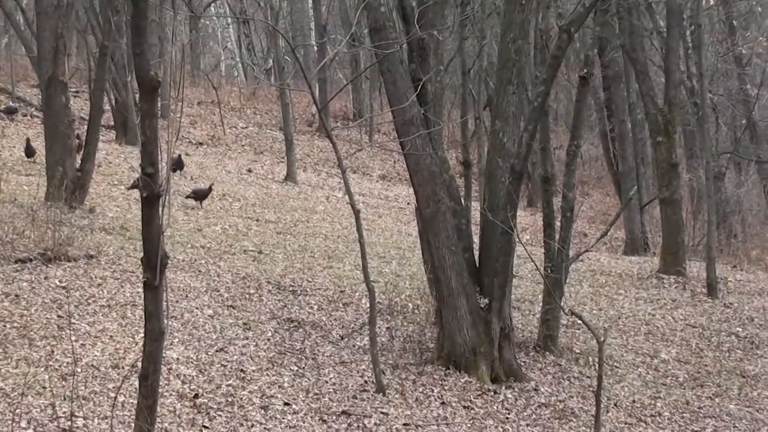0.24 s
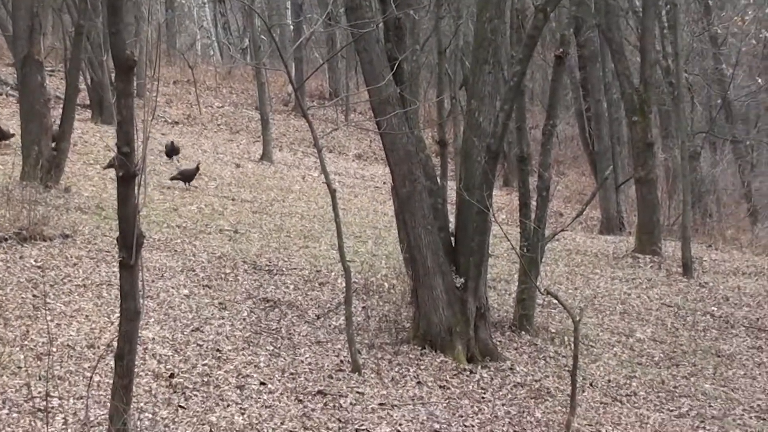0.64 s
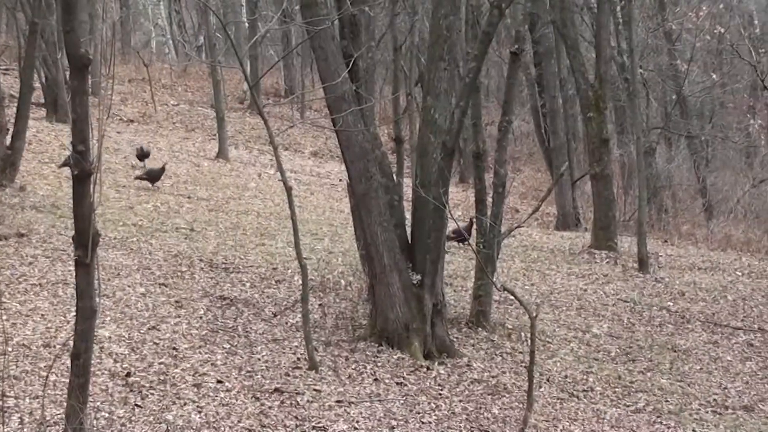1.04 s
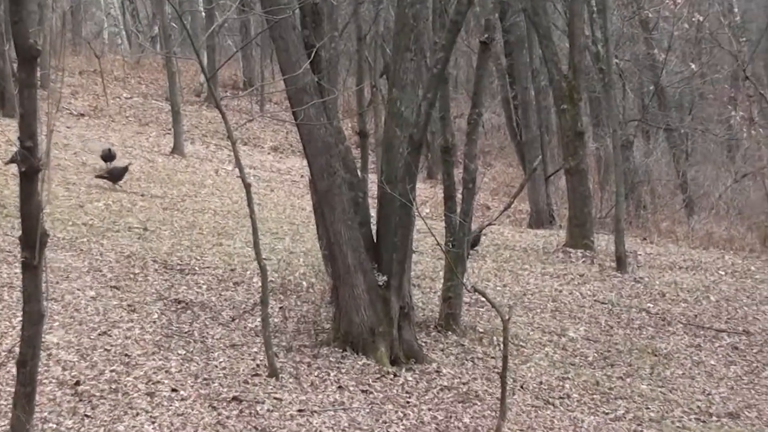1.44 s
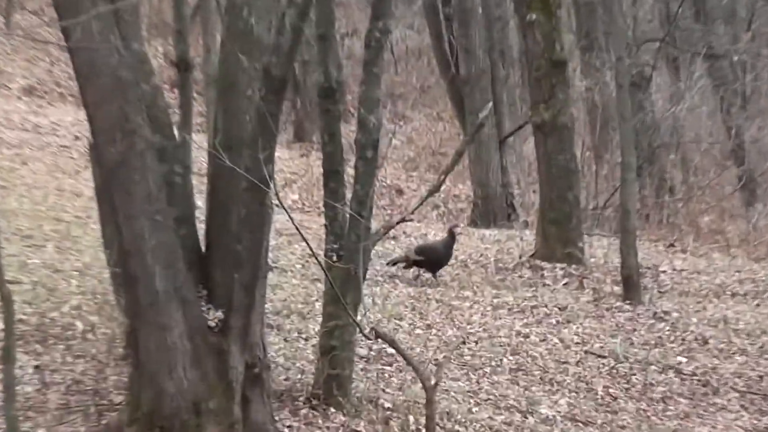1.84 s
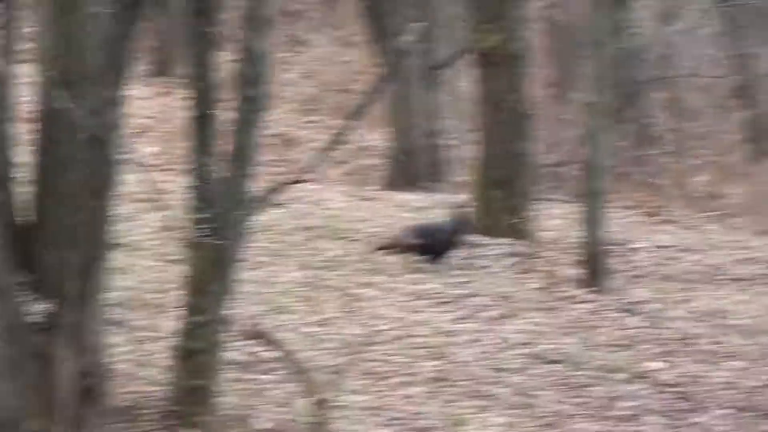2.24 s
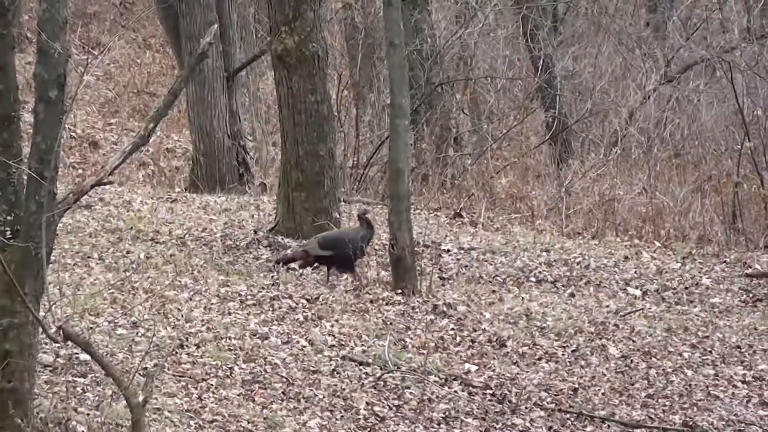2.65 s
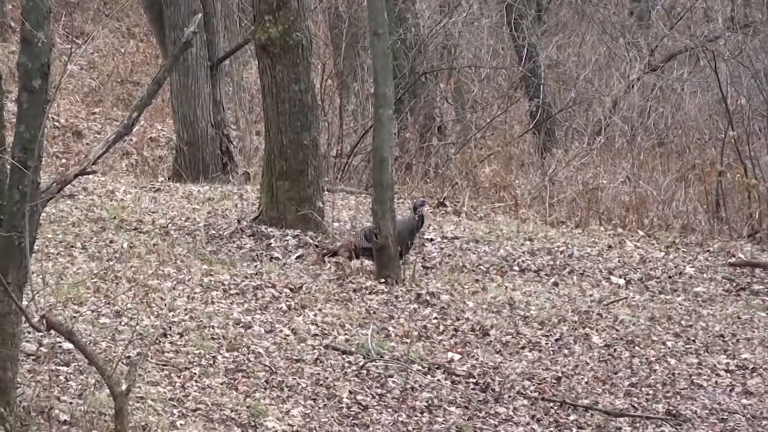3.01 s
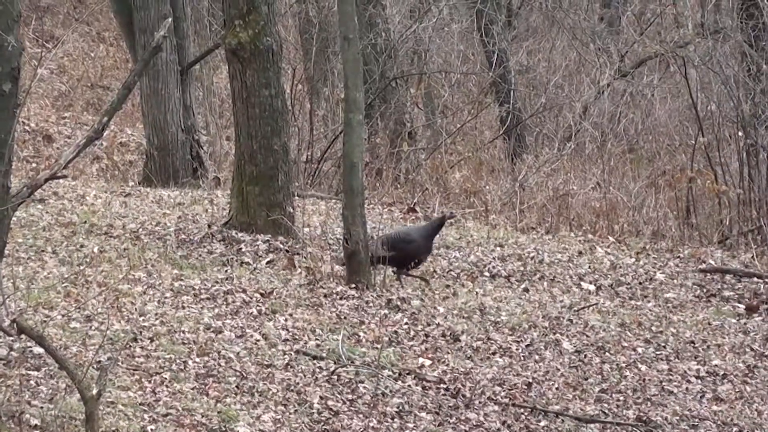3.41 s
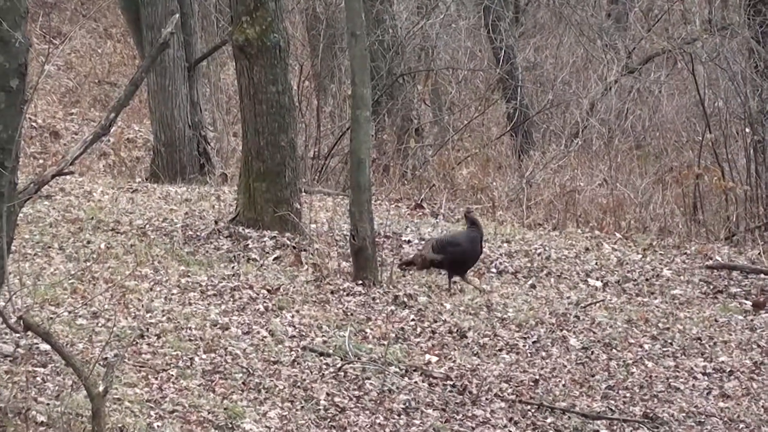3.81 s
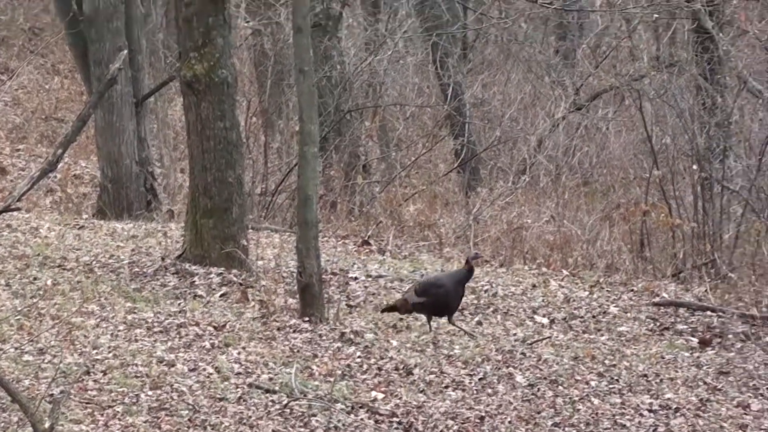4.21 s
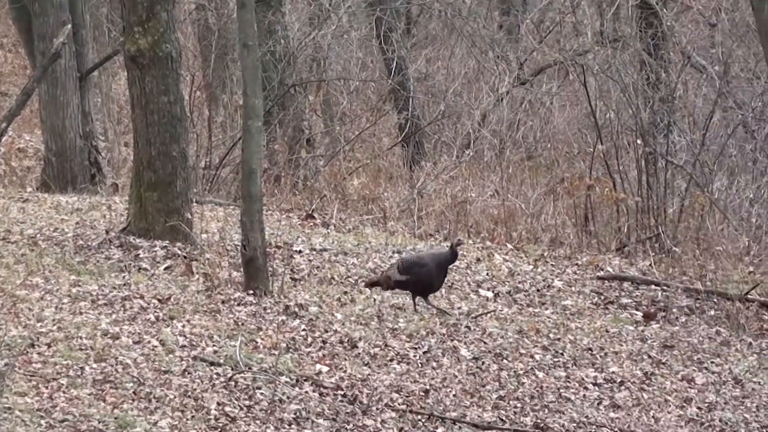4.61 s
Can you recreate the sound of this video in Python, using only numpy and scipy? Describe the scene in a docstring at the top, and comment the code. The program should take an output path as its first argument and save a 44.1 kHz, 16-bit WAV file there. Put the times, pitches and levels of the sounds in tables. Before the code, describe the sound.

A still, leafless wooded hillside, heard through a hand-held camera's microphone: soft airy hiss, a low hum and a very faint, high, steady motor whine. Wild turkeys walk in dry leaf litter. From 0 to 0.6 seconds small crisp crackles and many fine ticks come in irregular clusters, some with a woody body. Lighter snaps follow at 1.0 and 1.2. Around 1.5 the zoom motor whirrs briefly, thin and gritty, while a bright burst of sharp cracks runs from 1.5 to 1.65; a heavier, woody twig snap lands at 2.0, with weak ticks just after. It then grows sparse: a modest snap at 3.25, a soft, low handling bump at 3.5, and faint ticks. A dull hollow knock sounds at 4.15. At about 4.55 come the loudest, close, splintering cracks, with a short scatter off the ground and trunks. Faint low rumbling and a small knock end it near 4.8.

```python
"""Dry leaves and twigs crack sharply, near and far, as wild turkeys walk over a quiet wooded hillside.
Each crack is a noise-splintered pulse with a damped ring, a woody stem and a short scatter from ground and trunks.
Faint random ticks of resonant noise fill the litter between, and two dull knocks ring a hollow body.
Below lie the hand-held camera's sine whine, zoom whirr and soft rumbling bumps.
Shaped noise makes the still air of the wood and the microphone hiss."""
import sys
import numpy as np
from scipy import signal
from scipy.fft import rfft, irfft
from scipy.io import wavfile
from scipy.ndimage import uniform_filter1d

SR = 44100
rng = np.random.default_rng(int(sys.argv[2]) if len(sys.argv) > 2 else 0)


def master_out(mix):
    """Clip the mix to full scale and print it as 16-bit PCM to the path in sys.argv[1]."""
    frames = np.transpose(np.atleast_2d(mix))
    ceiling = np.clip(frames, -1, 1)
    pcm = np.round(ceiling * 32767).astype(np.int16)
    wavfile.write(sys.argv[1], SR, pcm)


N = 214354
TIME = np.arange(N) / SR


def from_db(db):
    """Decibels to gain."""
    return 10 ** (np.asarray(db) / 20)


def rms_one(x):
    """Scale to rms 1, over all channels together."""
    return x / np.sqrt(np.mean(x ** 2) + 1e-20)


def in_time(rows):
    """Draw straight lines between the points of a time curve, one value per sample."""
    return np.interp(TIME, *np.transpose(rows))


def at_hz(points, hz):
    """Read a spectrum on a log-frequency axis."""
    pitch, value = np.transpose(points)
    return np.interp(np.log(np.maximum(hz, 1)), np.log(pitch), value)


def left_right(mid, side, alike):
    """Blend a shared and an opposed signal: likeness 1 is mono, 0 is two unrelated channels."""
    alike = np.clip(alike, 0, 1)
    opposed = side * [[1], [-1]]
    return np.sqrt(1 + alike) * mid + np.sqrt(1 - alike) * opposed


def pair(alike, size):
    """Two white noises of given likeness."""
    mid, side = rng.standard_normal((2, size))
    return left_right(mid, side, alike) / np.sqrt(2)


def resonance(x, hz, width_hz):
    """Two-pole band-pass with a gain of about 1 at its peak."""
    radius = np.exp(-np.pi * width_hz / SR)
    feed = np.array([1, 0, -1]) * (1 - radius ** 2) / 2
    feedback = [1, -2 * radius * np.cos(2 * np.pi * hz / SR), radius ** 2]
    return signal.lfilter(feed, feedback, x)


def causal(db):
    """Minimum-phase response with this level at each bin: nothing sounds early."""
    cepstrum = irfft(np.log(from_db(db)))
    half = len(cepstrum) // 2
    # fold the time-reversed half onto the forward half
    cepstrum[1:half] *= 2
    cepstrum[half + 1:] = 0
    return np.exp(rfft(cepstrum))


def add(out, start_s, sound):
    """Mix a sound in at its start time."""
    i = int(np.clip(round(start_s * SR), 0, N - 1))
    out[:, i:i + sound.shape[-1]] += sound[..., :N - i]


def dying_noise(t, t60, alike):
    """Stereo noise that dies away, with a mean energy of 1 per channel."""
    noise = pair(alike, len(t)) * from_db(-60 * t / t60)
    return rms_one(noise) / np.sqrt(len(t))


def fracture(t, splinter_db, splinter_t60, bounce, bounce_s):
    """A break: one pulse, its bounce off a surface close by and brief splintering, evened to a flat spectrum."""
    burst = from_db(splinter_db) * dying_noise(t, splinter_t60, alike=0.84)
    burst[:, 0] += 1
    delay_s = abs(bounce_s) * (1 + rng.random()) / 1.5   # two to four thirds of bounce_s
    burst[:, int(delay_s * SR)] += bounce
    spectrum = rfft(burst)
    power = uniform_filter1d(np.mean(abs(spectrum) ** 2, axis=0), size=220)
    return spectrum * causal(-10 * np.log10(power))


# colour shared by all woody stems: pitch_hz [Hz], level_db [dB, relative]
STEM_COLOUR = [(60, -39), (250, -11), (430, -14.5), (660, 1.5), (950, 1.5), (1250, -3.5), (2200, -5.5),
               (4000, -22), (16000, -74)]
SNAP_LOW_SKIRT_DB, SNAP_HIGH_SKIRT_DB = 12, 19   # steepness of a snap's band below and above its pitch
SNAP_TOP_HZ, SNAP_TOP_DB_PER_OCT = 8740, 27.5   # above this the snaps fall away
SNAP_BASS_HZ, SNAP_BASS_DB_PER_OCT = 600, 28   # and below this


def crack_colour(hz, snap_hz, snap_db, spread, stem_db):
    """dB per bin: the dry blade snaps in a band about its pitch, and the stem adds a low, woody body."""
    octave = np.log2(np.maximum(hz, 20))
    away = (octave - np.log2(snap_hz)) / spread
    steepness = np.where(away < 0, SNAP_LOW_SKIRT_DB, SNAP_HIGH_SKIRT_DB)
    skirt = steepness * np.log10(1 + away ** 2)
    top = SNAP_TOP_DB_PER_OCT * np.maximum(octave - np.log2(SNAP_TOP_HZ), 0)
    bass = SNAP_BASS_DB_PER_OCT * np.maximum(np.log2(SNAP_BASS_HZ) - octave, 0)
    blade = from_db(snap_db - skirt - top - bass)
    stem = from_db(stem_db + at_hz(STEM_COLOUR, hz))
    return 20 * np.log10(np.hypot(blade, stem))


# leaf and twig cracks: start_s [s], snap_hz [Hz], snap_db [dB, relative],
# spread [octaves about the snap pitch], stem_db [dB, relative level of the woody stem]
LEAF_AND_TWIG_CRACKS = [(0.077, 2620, -16, 0.6, -12), (0.0919, 2280, -4, 0.54, -12.5),
                        (.0942, 2100, -7.5, 0.73, -6), (.1018, 2400, -27, .7, -14),
                        (0.121, 4950, -13, 0.38, -12), (.335, 3970, -18.5, 0.8, -15.5),
                        (0.3496, 1360, -11, .25, -30), (0.4412, 3970, -23.5, 0.57, -20),
                        (0.4745, 1350, -22.5, 1, -20), (.5191, 1570, -5.5, 0.6, -2),
                        (.524, 1200, -10, .6, -13), (0.743, 690, -21, .6, -22),
                        (1.0216, 1060, -7, .2, -17.5), (1.0226, 8600, -18, 1.23, -16.5),
                        (1.2241, 6340, -0.5, .3, -36), (1.2305, 5000, -2.5, 0.58, -39),
                        (1.498, 5600, -17, 0.46, -30), (1.507, 6180, -7.5, 0.24, -29),
                        (1.5165, 5000, -13, 0.46, -38), (1.5847, 7300, 2, 0.33, -13.5),
                        (1.5886, 5600, 0.5, 0.92, -16), (1.6013, 2960, 0.5, 0.32, -30),
                        (1.6008, 8400, -1.5, 0.6, -35), (1.639, 3400, 4.5, 0.35, -15),
                        (1.6501, 5740, 6.5, 0.79, -14), (2.0009, 5000, -26, 1.2, -13),
                        (2.0231, 4260, 5.5, 1.5, 13), (2.129, 2070, -20.5, .5, -23.5),
                        (2.192, 5330, -14.5, 0.44, -36), (3.2558, 3430, -9.5, 0.36, -14),
                        (3.6237, 4940, -26.5, 0.66, -32), (3.963, 5030, -27, 1, -18),
                        (4.5156, 3500, -11, 0.47, -22), (4.54, 6200, 6, 0.79, 0.5),
                        (4.5574, 5130, 11, 0.63, 3), (4.8045, 880, -16, 0.36, -21)]
# splintering of a 0 dB snap [s]; it lasts twice as long per this many dB more
SPLINTER_T60_S, SPLINTER_DOUBLES_DB = .016, 49


def cracks(level_db, ring_db, ring_width, scatter_db, scatter_t60, wetter_far, size=8192):
    """Each piece snaps with one damped ring, then litter and trunks scatter it; faint, far ones scatter more."""
    out, t, hz = np.zeros((2, N)), np.arange(size) / SR, np.fft.rfftfreq(size, 1 / SR)
    for start_s, snap_hz, snap_db, spread, stem_db in LEAF_AND_TWIG_CRACKS:
        # ring_width is a fraction of the snap pitch
        ring = causal(ring_db / (1 + ((hz / snap_hz - 1) / ring_width) ** 2))
        splinter_t60 = SPLINTER_T60_S * 2 ** (snap_db / SPLINTER_DOUBLES_DB)
        direct = ring * fracture(t, splinter_db=9.5, splinter_t60=splinter_t60, bounce=1.0, bounce_s=0.000964)
        build_up = 1 - np.exp(-t / 0.0093)   # the scatter gathers over some 9 ms
        scatter = rfft(dying_noise(t, scatter_t60, alike=0.78) * build_up)
        wet = from_db(scatter_db - wetter_far * max(snap_db, stem_db))
        colour = causal(crack_colour(hz, snap_hz, snap_db, spread, stem_db) + level_db)
        add(out, start_s, irfft((direct + wet * scatter) * colour))
    return out


# bending modes of a twig: pitch_hz [Hz, before a small random detuning], level_db [dB, relative], t60_s [s]
TWIG_BENDING_MODES = [(691, -5, 0.076), (865, -10, 0.16), (1060, -4.5, 0.1), (1293, 3.5, 0.051)]
TWIG_RING_DB = -44.5   # ring of the twig against the level of its stem


def twigs(pan_db, size=4096):
    """A snapped twig rings in its bending modes, the more the woodier it is, each slightly detuned at random."""
    out, t = np.zeros((2, N)), np.arange(size) / SR
    for start_s, *_, stem_db in LEAF_AND_TWIG_CRACKS:
        for hz, mode_db, t60 in TWIG_BENDING_MODES:
            pitch = hz * (1 + 0.0075 * rng.standard_normal())
            decay = from_db(stem_db + TWIG_RING_DB + mode_db - 60 * t / t60)
            add(out, start_s, decay * np.cos(2 * np.pi * pitch * t))
    # pan_db is left against right
    return out * from_db(np.array([[.5], [-.5]]) * pan_db)


# how busy the small leaf ticks are: time_s [s, point of a curve joined by straight lines], rate [ticks per s]
TICK_RATE = [(0, 43), (.6, 25), (1.2, 12), (2.2, 20), (2.6, 4), (3.8, 6), (4.86, 14)]


def leaf_ticks(level_db, spread_db, t60, count=6, size=1024):
    """Tiny breaks in the litter come at random, each on one of a few leaf pitches."""
    born = rng.random(N) < in_time(TICK_RATE) / SR
    clicks = born * from_db(level_db + spread_db * rng.uniform(-0.42, 1, N))
    leaf = rng.integers(0, count, N)
    t, out = np.arange(size) / SR, 0
    for k, hz in enumerate(np.geomspace(900, 5500, count)):
        tick = resonance(dying_noise(t, t60, alike=1.0), hz, hz)
        tick = tick * np.sqrt(1000 / hz)   # evens out the wider bands of higher leaves
        chosen = (clicks * (leaf == k))[None]
        out = out + signal.oaconvolve(chosen, tick, axes=1)[:, :N]
    return out


# dull knocks: start_s [s], level_db [dB, peak of a 0 dB mode], contact_s [s]
DULL_KNOCKS = [(4.148, -43, 0.0195), (4.804, -67, 0.04)]
# what a knock rings with: pitch_hz [Hz], level_db [dB, relative], t60_s [s]
HOLLOW_BODY_MODES = [(268, 0, 0.14), (513, -3, 0.092), (770, -4.5, 0.038), (883, -12, 0.13)]


def knocks(size=8192):
    """A soft, slightly chattering contact sets a hollow body ringing."""
    out, t = np.zeros((2, N)), np.arange(size) / SR
    for start_s, level_db, contact_s in DULL_KNOCKS:
        push = rng.standard_normal(size) * np.sin(np.pi * np.minimum(t / contact_s, 1))
        for hz, mode_db, t60 in HOLLOW_BODY_MODES:
            mode = np.sin(2 * np.pi * hz * t) * from_db(-60 * t / t60)
            ring = signal.fftconvolve(push, mode)[:size]
            add(out, start_s, from_db(level_db + mode_db) * ring / abs(ring).max())
    return out


# soft bumps of the hand on the camera: centre_s [s], level_db [dB, rms],
# pitch_hz [Hz], length_s [s, standard deviation of the swell]
HAND_BUMPS = [(3.502, -50.5, 42.4, 0.012), (4.44, -71, 40, 0.023), (4.828, -55.5, 169, 0.028),
              (4.842, -62, 50.3, .03)]


def bumps():
    """The hand shifts on the camera: short swells of low, resonant noise."""
    out = 0
    for centre_s, level_db, hz, length_s in HAND_BUMPS:
        swell = np.exp(-.5 * ((TIME - centre_s) / length_s) ** 2)
        noise = rng.standard_normal(N)
        rumble = swell * resonance(resonance(noise, hz, hz), hz, hz)
        level = np.sqrt(np.sum(swell ** 2) / np.sum(rumble ** 2))
        out = out + from_db(level_db) * rumble * level
    return out


# steady whine of the camera: pitch_hz [Hz], level_db [dB, rms]
CAMERA_WHINE = [(242, -78.5), (839.8, -78), (1259, -79), (2517, -70), (5034, -84), (8391, -78)]
# level of the zoom motor: time_s [s, point of a curve joined by straight lines], level_db [dB, rms]
ZOOM_LEVEL = [(0, -67), (1.3, -81), (1.44, -66), (1.53, -53.5), (1.8, -64), (2.1, -62.5), (2.3, -88),
              (2.6, -69.5), (4.86, -71.5)]
# resonances of the zoom gears: pitch_hz [Hz], width_hz [Hz], level_db [dB, relative]
ZOOM_GEAR_MODES = [(984, 56, 5), (4000, 600, -6.5), (5290, 120, 4), (5600, 420, -0.5), (6850, 390, -3.5)]


def camera(waver):
    """A small motor whines with slightly uneven speed; the zoom gears whirr in their resonances."""
    speed = 1 + waver * rms_one(uniform_filter1d(rng.standard_normal(N), size=1500))
    clock = np.cumsum(speed) / SR
    whine = 0
    for hz, level_db in CAMERA_WHINE:
        tone = np.sin(2 * np.pi * (hz * clock + rng.random()))
        whine = whine + np.sqrt(2) * from_db(level_db) * tone
    gears = pair(0.84, N)
    whirr = sum(from_db(level_db) * resonance(gears, hz, width_hz) for hz, width_hz, level_db in ZOOM_GEAR_MODES)
    return whine + from_db(in_time(ZOOM_LEVEL)) * rms_one(whirr)


# colour of the wood's air and microphone hiss: pitch_hz [Hz], level_db [dB per Hz, relative]
AIR_COLOUR = [(15, -55), (25, -28), (43, -7), (75, -9), (240, -3.5), (289, -9.5), (457, -7.5), (666, -9),
              (826, -11), (970, -10.5), (1240, -12.5), (2300, -14), (2490, -14.5), (2770, -16),
              (15500, -23)]
# level of the air: time_s [s, point of a curve joined by straight lines], level_db [dB, rms]
AIR_LEVEL = [(0, -57.5), (1.2, -57.5), (2.3, -57.5), (2.8, -59.5), (3.9, -58), (4.86, -59)]
# left-right likeness of the air: pitch_hz [Hz], likeness [0-1]
AIR_LIKENESS = [(50, 0.95), (130, 0.97), (260, 0.75), (600, 0), (2000, 0.09), (6000, 0.89), (12000, 1)]


def air():
    """Still air and hiss as smooth shaped noise, widest between about 600 and 2000 Hz."""
    hz = np.fft.rfftfreq(N, 1 / SR)
    mid, side = rfft(rng.standard_normal((2, N))) * from_db(at_hz(AIR_COLOUR, hz))
    spectrum = left_right(mid, side, at_hz(AIR_LIKENESS, hz))
    return from_db(in_time(AIR_LEVEL)) * rms_one(irfft(spectrum, N))


def scene():
    """Cracking leaf litter over the camera's own sounds and the quiet of the wood."""
    snaps = cracks(level_db=0.0, ring_db=8, ring_width=0.05, scatter_db=-6.5, scatter_t60=0.13, wetter_far=0.44)
    ticks = leaf_ticks(level_db=-28, spread_db=5.0, t60=.02)
    litter = snaps + twigs(pan_db=-6.0) + ticks + knocks()
    return litter + bumps() + camera(waver=0.00072) + air()


def record(dry):
    """The top is cut steeply above 16 kHz."""
    low_pass = signal.ellip(10, .1, 70, 16000, fs=SR, output="sos")
    return signal.sosfilt(low_pass, dry)


dry = scene()
out = record(dry)
master_out(out)
```